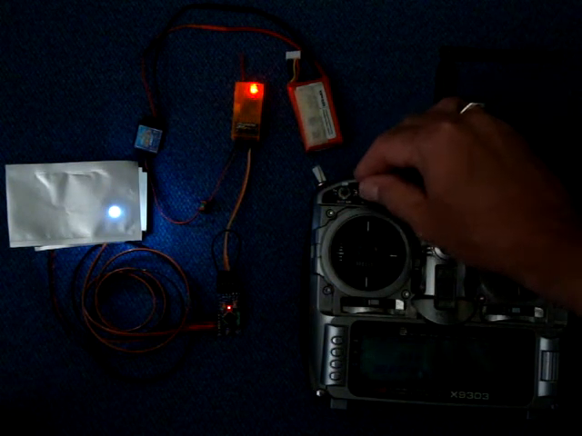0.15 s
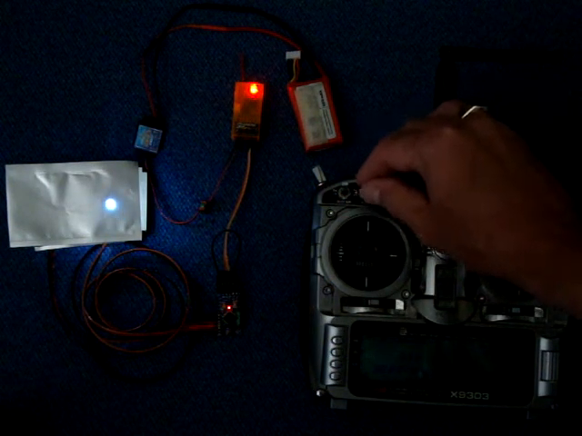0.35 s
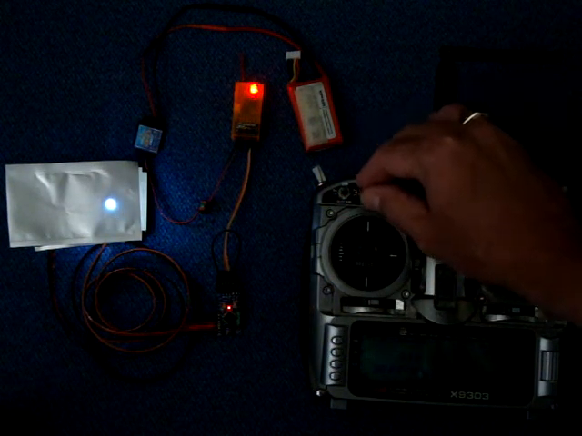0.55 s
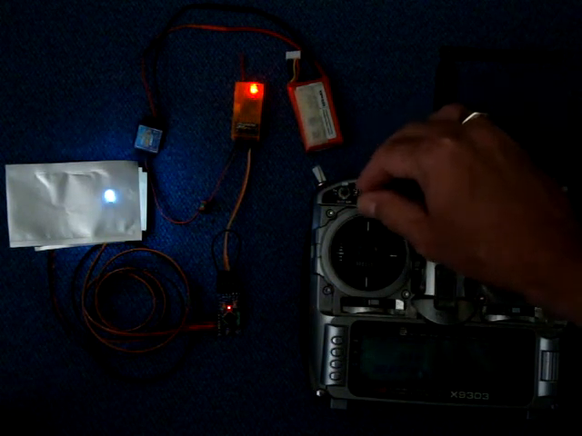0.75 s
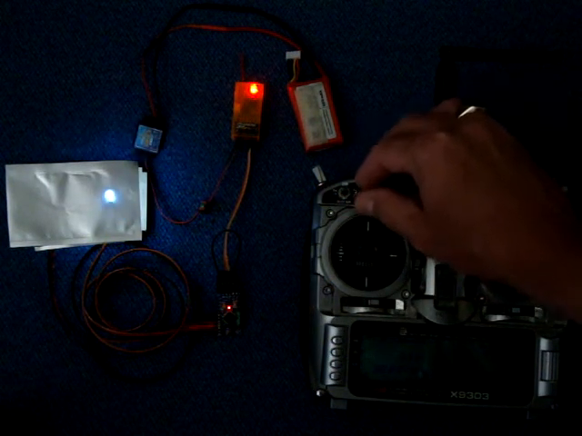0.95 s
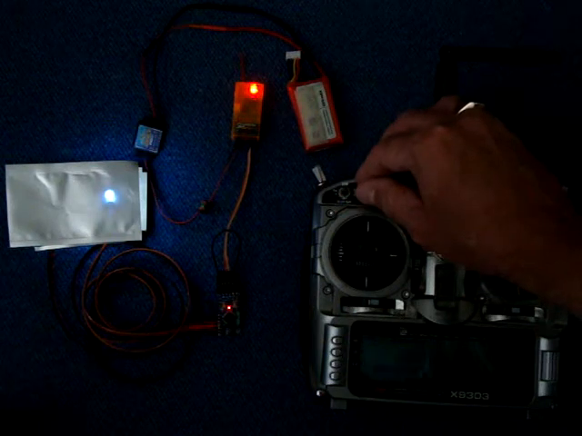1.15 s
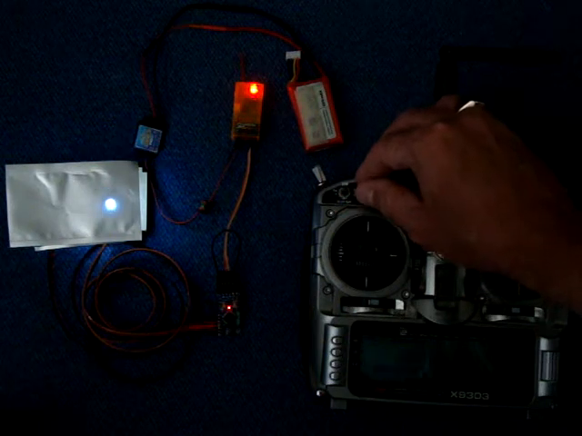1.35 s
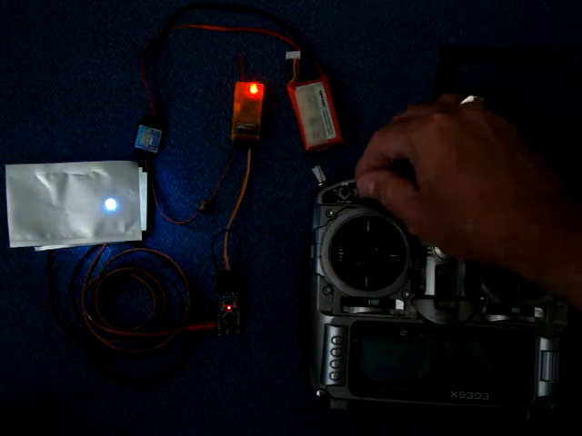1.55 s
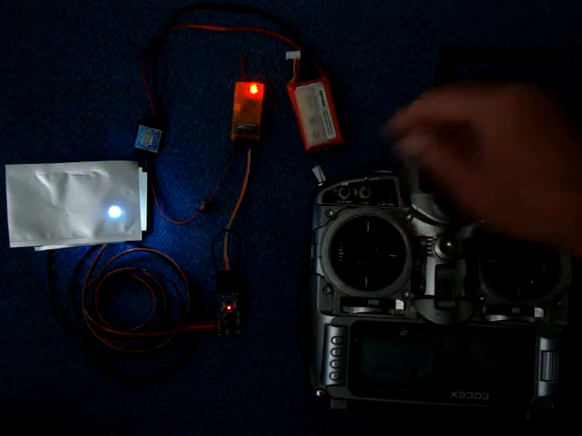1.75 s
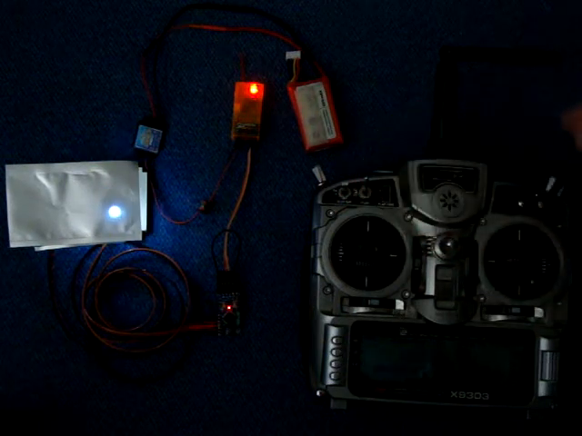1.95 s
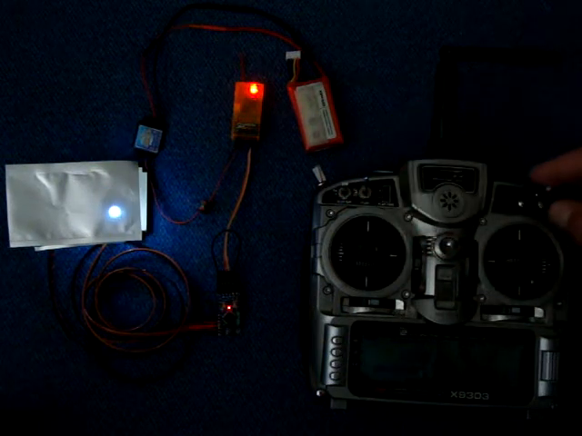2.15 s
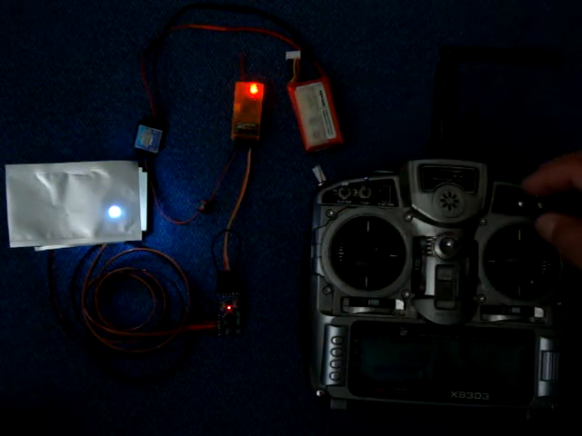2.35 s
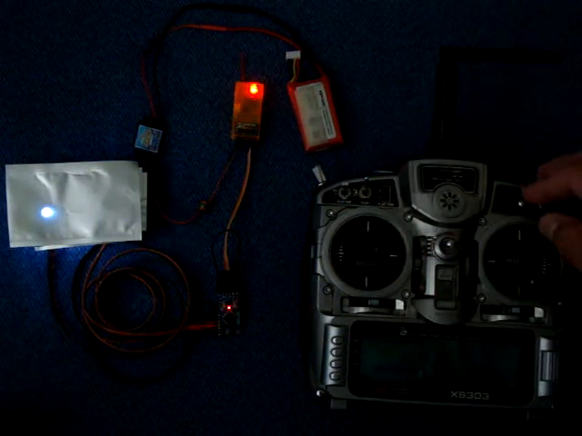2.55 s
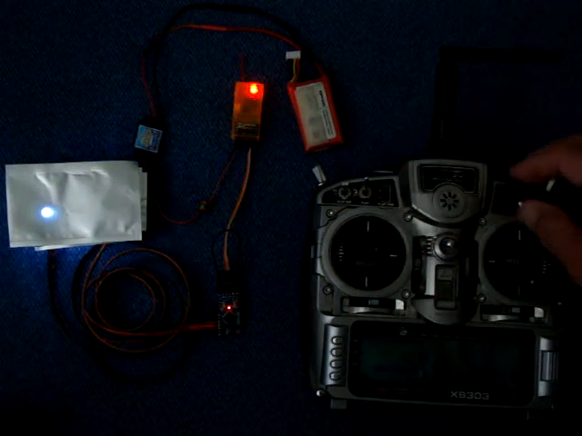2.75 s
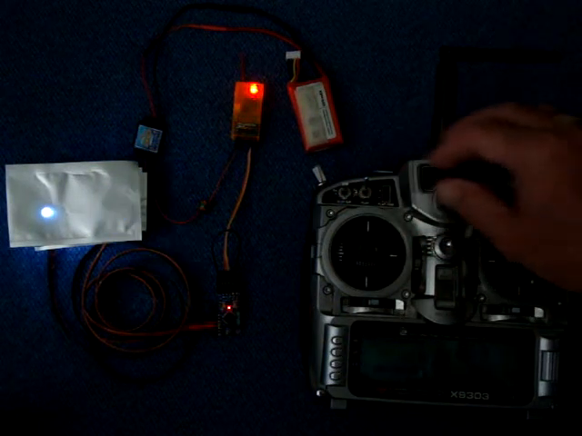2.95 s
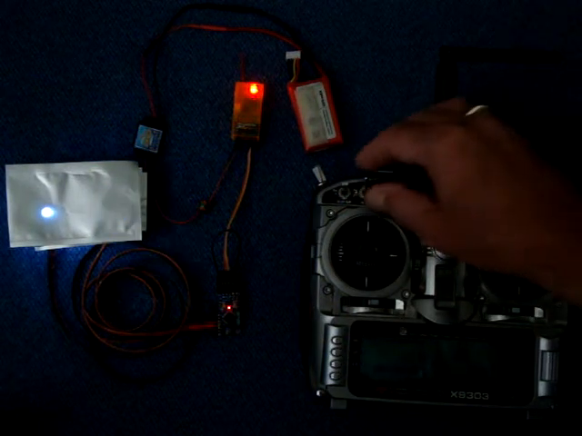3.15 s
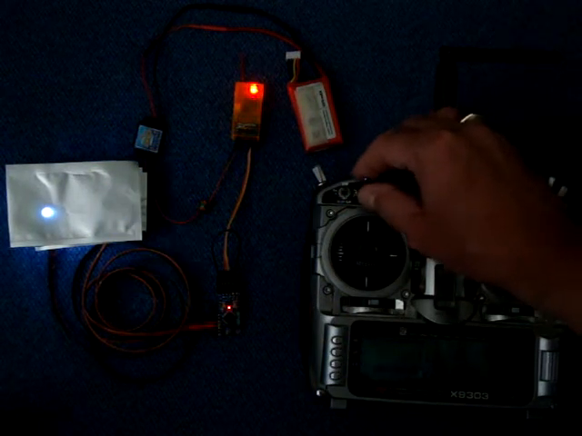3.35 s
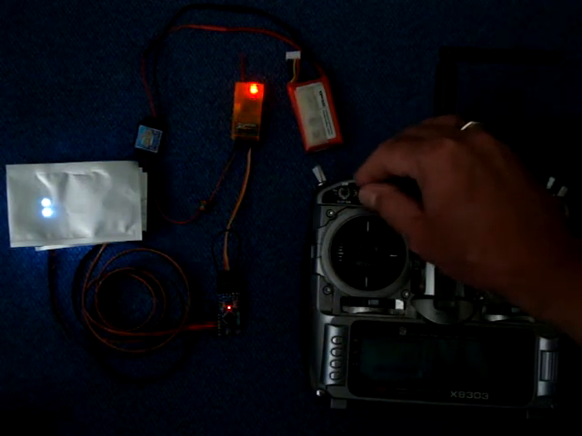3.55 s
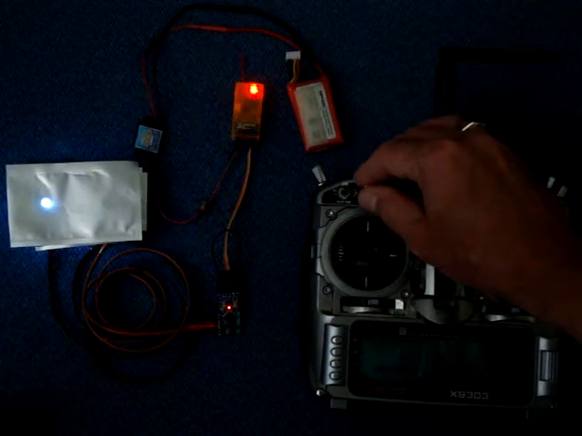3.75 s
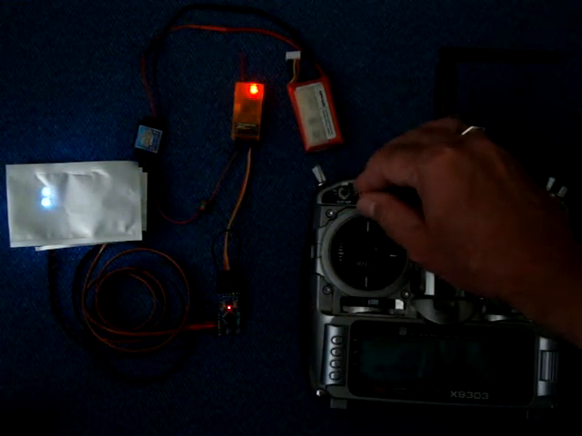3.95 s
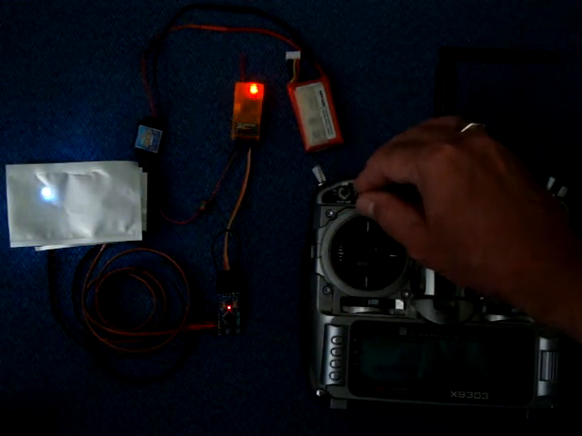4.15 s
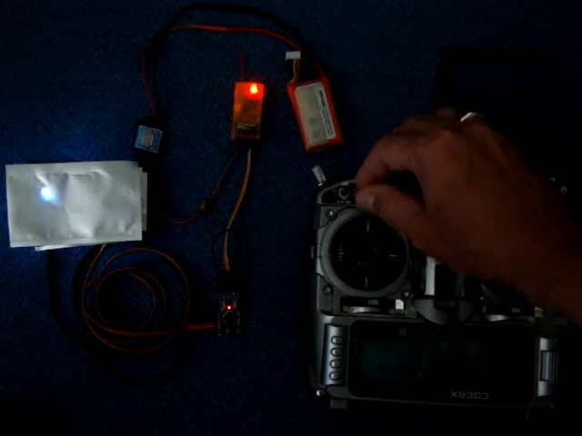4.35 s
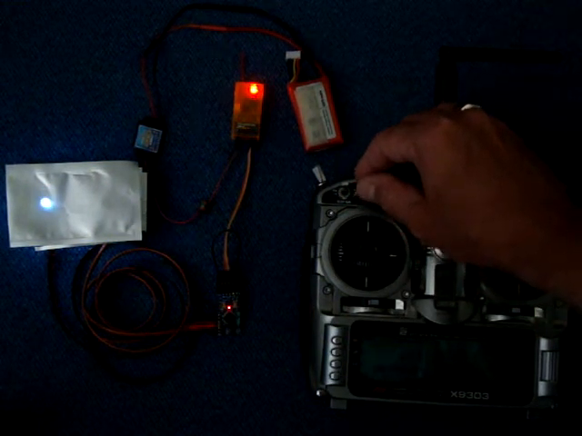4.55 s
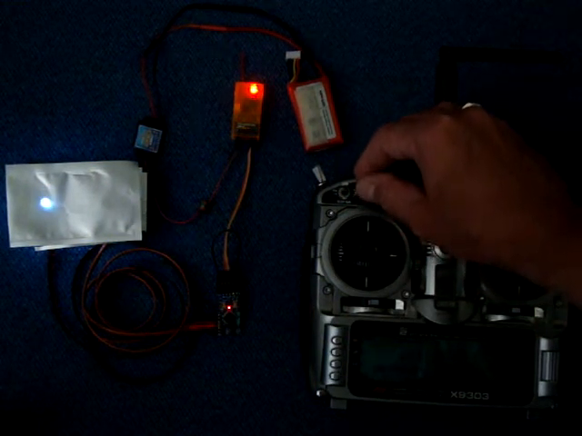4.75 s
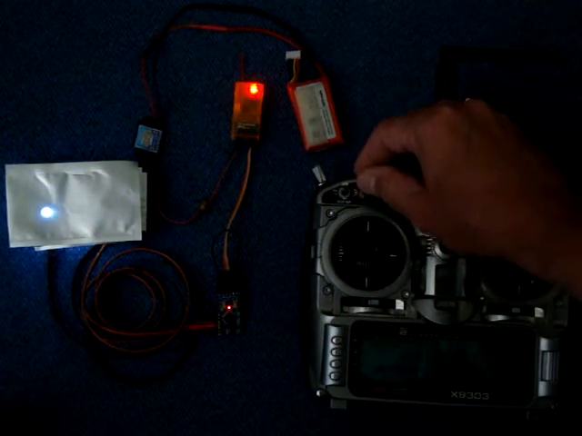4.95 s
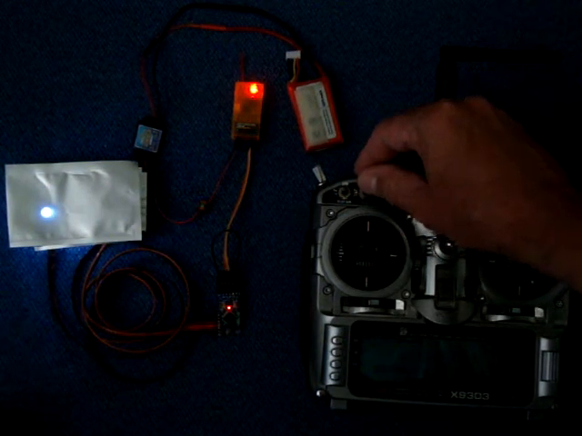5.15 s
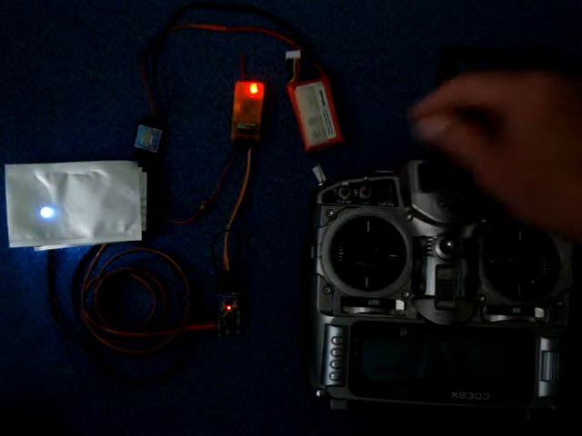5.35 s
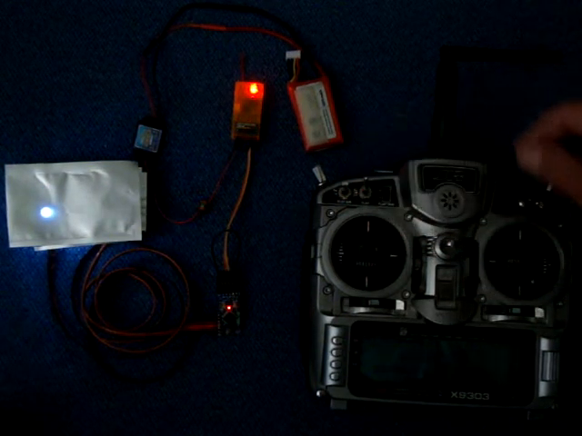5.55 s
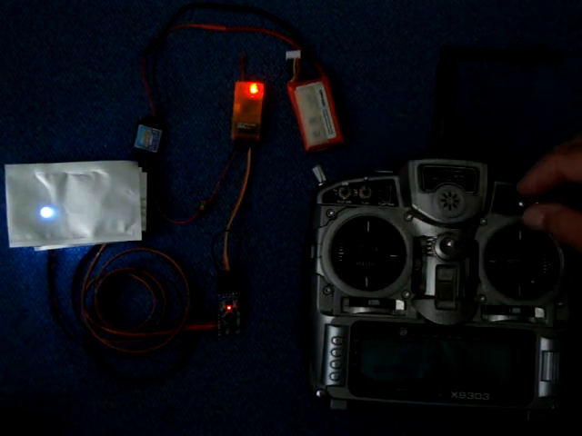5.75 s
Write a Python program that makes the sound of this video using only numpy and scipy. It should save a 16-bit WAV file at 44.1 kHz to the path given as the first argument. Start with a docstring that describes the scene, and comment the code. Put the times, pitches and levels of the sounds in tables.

```python
"""In a small room, toggle switches on a handheld radio-control transmitter are flicked on a table.
The spring contact ticks, the lever knocks its stop and the plastic case rings: force pulses excite
a bank of decaying modes. Two dull finger taps fall on the case, and a small servo twitches now and
then as brief runs of ticks. An echo and a diffuse field surround them, over steady filtered noise."""
import sys
import numpy as np
from scipy import signal
from scipy.fft import rfft, irfft, next_fast_len
from scipy.io import wavfile

SR = 44100
rng = np.random.default_rng(int(sys.argv[2]) if len(sys.argv) > 2 else 0)


def waveform_to_disk(signal):
    """Save audio, clipped to [-1, 1], as 16-bit WAV at the path in sys.argv[1]."""
    frames = np.transpose(np.atleast_2d(signal))
    scaled = np.clip(frames, -1, 1) * 32767
    samples = np.round(scaled).astype(np.int16)
    wavfile.write(sys.argv[1], SR, samples)


N = 255780

# Spectrum of the steady hiss, held constant above 9500 Hz: (frequency [Hz], relative density [dB])
HISS_SPECTRUM = [(15, -45), (25, -21), (124, -6), (152, -5.5), (227, 0), (339, 1.5), (532, 1), (737, -0.5),
                 (948, -1.5), (1730, -5.5), (2220, -6.5), (4710, -8.5), (10000, -11), (13000, -44),
                 (22000, -120)]
HISS_DB = -57   # rms level before the final low-pass

# Reverberation time of the room: (frequency [Hz], T60 [s])
ROOM_T60 = [(300, 0.18), (900, 0.3), (2000, 0.298), (4000, 0.38), (9000, 0.6)]
# Strength of the diffuse field: (frequency [Hz], reverberant over direct energy [dB])
ROOM_COLOUR = [(300, -10), (900, -6), (1400, -8.5), (2200, -6.5), (4000, -10.5), (9000, -41)]
ROOM_GAP_S, ROOM_BUILD_S = 0.00097, 0.00091   # delay and build-up time of the diffuse field
# A small hard object nearby returns only the treble
ECHO_S, ECHO_DB, ECHO_HZ = 0.0064, -10.5, 3240

# Servo twitches: (time of first tick [s], ticks [count], level [dB], change per tick [dB])
TWITCHES = [(2.9042, 3, -41.5, -10), (3.6700, 3, -48.5, -1), (5.1200, 2, -53, 0), (5.1870, 1, -52, 0),
            (5.471, 4, -49.5, -0.5), (5.5538, 3, -47.5, -1.5), (5.637, 3, -53.5, 0.4)]
# Modes of the servo: (frequency [Hz], level [dB], T60 [s])
SERVO_MODES = [(2300, 2, 0.008), (2630, -1.5, 0.0125), (3050, -5, .008), (3830, -5, 0.008),
               (4770, 1.5, 0.0061), (6630, -2, 0.0062)]
PULSE_S = 0.0168   # control pulse interval

# Frequencies at which the drive of a blow is specified: (frequency [Hz])
BLOW_HZ = [850, 1150, 1700, 2800, 5000, 8500]
# Colour of each kind of blow: (drive at each BLOW_HZ [dB] .., chatter time constant [ms]);
# a negative time constant makes the chatter swell until its window ends
CONTACT = (-21, -23, -18, -14, -2.5, -5, 0.1)
STOP = (-2, -5.5, -1.5, 0, -3, -8, 3)
REBOUND = (-8.5, -0.5, -16, -16, -23, -24, -3)
SETTLE = (0.5, -2, -18, -14, 3, -22, -6.5)
SPRING = (-21, -16, -16.5, -4, -7.5, 1, 1.8)
SEAT = (-3.5, -0.5, -12, 0.5, 3, -17, 3.5)
TAP = (-0.5, -2, -27.5, -13, -15, -21, 6)
# Weighting of the crack, favouring 2800 over 1700 Hz: (multiplier of the crack's dB at each BLOW_HZ ..)
CRACK = (0, 0, -0.5, 1, 0, 0)

# Dull finger taps on the case: (time [s], level [dB])
TAPS = [(2.2094, -40.5), (2.3350, -49.5)]
# Light throws: (time of tick [s], tick [dB], seating [dB], seating lag [ms], seating hardness [dB/octave])
FLICKS = [(0.2477, -23, -29.5, 3.2, 2.5), (1.1544, -22.5, -40, 5.9, -7), (1.5170, -25.5, -40.5, 6.3, -10),
          (3.5090, -23.5, -27.5, 3.0, 3), (4.4674, -23, -30, 3.5, -0.5)]
# Hard throws: (time of knock [s], tick [dB], knock [dB], rebound [dB], settling [dB], tick lead [ms],
# rebound lag [ms], hardness of all but the tick [dB/octave], crack of the knock [dB])
SNAPS = [(0.6147, -20, -19.5, -17.5, -22.5, 2.5, 4.1, 2, 3.5),
         (2.4694, -23, -19.5, -12.5, -49, 2.3, 3.71, 1, 12),
         (3.8937, -21.5, -19, -20, -22.5, 2.3, 4.1, 1, 2),
         (4.8461, -23, -18.5, -23, -28.5, 3, 3.4, -2.5, 3.5)]
SETTLE_MS = 3.424   # after the rebound

# Modes of case and switch: (frequency [Hz], level [dB], T60 [s])
CASE_MODES = [(348, -24.5, 0.04), (638, -19.5, 0.052), (672.6, -15.5, 0.091), (834, -6, 0.071),
              (921, -1.5, 0.047), (909, -0.5, 0.055), (1103, -0.5, 0.035), (1248, -4.5, 0.036),
              (1313, -5.5, 0.037), (1473, -2.5, 0.017), (1692, -4.5, 0.066), (1826, -8, 0.061),
              (2240, 0.5, 0.015), (2322, 1, 0.0099), (2547, -3, 0.0084), (2973, -9.5, 0.013),
              (3405, -10.5, 0.019), (3584, -7, 0.0078), (3996, -13.5, 0.016), (4340, -14, 0.0086),
              (4830, -11, 0.0094), (5320, -9, 0.00605), (6080, -2, 0.0047), (7100, -6.5, 0.005),
              (7700, -12, 0.0084), (8300, -5.5, 0.0058), (8280, -0.5, 0.0019), (9570, -5.5, 0.0054)]
BLOW_SPREAD_DB = 1.5   # standard deviation, drawn for every blow and mode
CHATTER_DB, CHATTER_HZ = -0.5, 3600   # above this the chatter takes over from the single push
CASE_LOW_HZ = 315   # the small case radiates little below this

CUTOFF_HZ, CONVERTER_DB = 10050, -99


def amp(db):
    """Level definition: decibels to an amplitude ratio."""
    return 10 ** (np.asarray(db) / 20)


def at_hz(points, hz):
    """Logarithmic frequency scale: interpolates a (frequency [Hz], value) table along it."""
    points = np.array(points)
    return np.interp(np.log(hz), np.log(points[:, 0]), points[:, 1])


def filtered(x, order, hz, kind="low"):
    """Linear filtering: a Butterworth filter of the given order and kind."""
    return signal.sosfilt(signal.butter(order, hz, kind, fs=SR, output="sos"), x)


def hiss():
    """Stationary noise: room air and preamplifier as white noise shaped by a smooth spectrum."""
    size = next_fast_len(N)
    hz = np.maximum(np.arange(size // 2 + 1) * SR / size, 1)
    shape = amp(at_hz(HISS_SPECTRUM, np.minimum(hz, 9500)))
    noise = irfft(rfft(rng.standard_normal(size)) * shape, size)[:N]
    noise = filtered(noise, 8, CUTOFF_HZ)
    return amp(HISS_DB) * noise / np.std(noise)


def near_echo(x):
    """Specular reflection: a delayed copy containing only the treble."""
    bright = filtered(x, 2, ECHO_HZ, "high")
    return amp(ECHO_DB) * np.roll(bright, round(ECHO_S * SR))


def diffuse_field(x):
    """Statistical reverberation: the stored energy of each band shapes dying noise."""
    out = np.zeros(N)
    edges = 250 * 2 ** (np.arange(23) / 4)   # quarter-octave bands
    white = rng.standard_normal((2, N))   # adjacent bands use different noises
    build = np.exp(-1 / (ROOM_BUILD_S * SR))
    for k, (low, high) in enumerate(zip(edges, edges[1:])):
        direct, noise = filtered([x, white[k % 2]], 2, [low, high], "band")
        hz = np.sqrt(low * high)
        # Energy falls 60 dB in T60, hence 120 on the amplitude scale
        fade = amp(-120 / (at_hz(ROOM_T60, hz) * SR))
        energy = direct ** 2 + 1e-18   # tiny floor keeps the square root safe
        stored = signal.lfilter([1 - fade], [1, -fade], energy)
        stored = signal.lfilter([1 - build], [1, -build], stored)
        stored = np.roll(stored, round(ROOM_GAP_S * SR))
        out += amp(at_hz(ROOM_COLOUR, hz)) * np.sqrt(stored) * noise / np.std(noise)
    return out


def room(x):
    """Superposition: direct sound, one near echo and the diffuse field."""
    return x + near_echo(x) + diffuse_field(x)


def strike(times, forces, hz, t60):
    """Damped resonance: force pulses (one row each) ring a mode; a unit click gives a sine of height 1."""
    drive = np.full(N, 1e-18)   # inaudible floor
    for s, force in zip(times, forces):
        at = round(s * SR)
        drive[at:at + len(force)] += force
    radius = amp(-60 / (t60 * SR))
    angle = 2 * np.pi * hz / SR
    return signal.lfilter([0, np.sin(angle)], [1, -2 * radius * np.cos(angle), radius ** 2], drive)


def servo():
    """Impulsive excitation: the gear train ticks once per control pulse while the servo hunts for its place."""
    times = np.concatenate([s + PULSE_S * np.arange(n) for s, n, _, _ in TWITCHES])
    gains = np.concatenate([amp(db + step * np.arange(n)) for _, n, db, step in TWITCHES])
    out = np.zeros(N)
    for k, (hz, level_db, t60) in enumerate(SERVO_MODES):
        clicks = gains[:, None] * amp(level_db)   # one sample each
        out += (-1) ** k * strike(times, clicks, hz, t60)
    return out


def blow(s, colour, level_db, hardness=0):
    """Contact stiffness: hardness tilts the drive spectrum; returns (time, drive .., chatter constant)."""
    octaves = np.log2(np.array(BLOW_HZ) / BLOW_HZ[1])
    drive_db = np.array(colour[:-1]) + level_db + hardness * octaves
    return [s, *drive_db, colour[-1]]


def blows():
    """Successive impacts: every throw of a lever unfolds into its run of blows."""
    rows = [blow(s, TAP, db) for s, db in TAPS]
    for s, tick_db, knock_db, rebound_db, settle_db, lead_ms, lag_ms, hardness, crack_db in SNAPS:
        cracked_db = knock_db + crack_db * np.array(CRACK)
        rows += [blow(s - lead_ms / 1000, CONTACT, tick_db),
                 blow(s, STOP, cracked_db, hardness),
                 blow(s + lag_ms / 1000, REBOUND, rebound_db, hardness),
                 blow(s + (lag_ms + SETTLE_MS) / 1000, SETTLE, settle_db, hardness)]
    for s, tick_db, seat_db, lag_ms, hardness in FLICKS:
        rows += [blow(s, SPRING, tick_db),
                 blow(s + lag_ms / 1000, SEAT, seat_db, hardness)]
    return np.array(rows)


def blow_forces(time_constants_ms):
    """Force spectrum: a single push supplies the low part, a noisy chatter of the parts the treble."""
    ms = np.arange(600) / SR * 1000
    envelope = np.sqrt(ms) * np.exp(-ms / time_constants_ms[:, None])
    chatter = rng.standard_normal(envelope.shape) * envelope
    # As much energy as one unit click
    chatter /= np.sqrt(np.sum(chatter ** 2, axis=1, keepdims=True))
    push = (ms == 0).astype(float)
    return filtered(push, 2, CHATTER_HZ) + amp(CHATTER_DB) * filtered(chatter, 2, CHATTER_HZ, "high")


def switches():
    """Modal superposition: the colour and hardness of each blow set its drive of every case mode."""
    rows = blows()
    times, drives_db = rows[:, 0], rows[:, 1:-1]
    forces = blow_forces(rows[:, -1])
    chance = rng.standard_normal((len(rows), len(CASE_MODES)))
    out = np.zeros(N)
    for k, (hz, level_db, t60) in enumerate(CASE_MODES):
        drive_db = np.array([at_hz(np.transpose([BLOW_HZ, row]), hz) for row in drives_db])
        gains = amp(drive_db + level_db + BLOW_SPREAD_DB * chance[:, k])
        out += (-1) ** k * strike(times, gains[:, None] * forces, hz, t60)   # alternating polarity
    return out


def scene():
    """Radiation from a small body: clicks lose their bass, then sound in the room over the hiss."""
    clicks = filtered(switches() + servo(), 3, CASE_LOW_HZ, "high")
    return (room(clicks) + hiss())[None]


def record(dry):
    """Band limitation: a steep elliptic low-pass cuts the top, then faint white converter noise is added."""
    steep = signal.ellip(12, 0.5, 70, CUTOFF_HZ, fs=SR, output="sos")
    cut = signal.sosfilt(steep, dry)
    return cut + amp(CONVERTER_DB) * rng.standard_normal(dry.shape)


dry = scene()
out = record(dry)
waveform_to_disk(out)
```